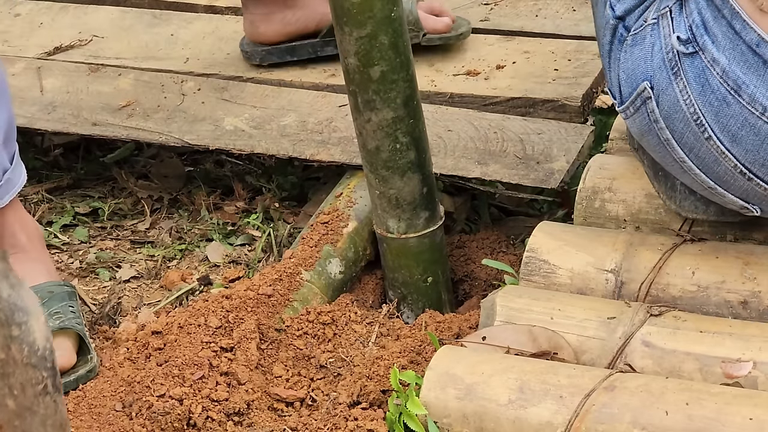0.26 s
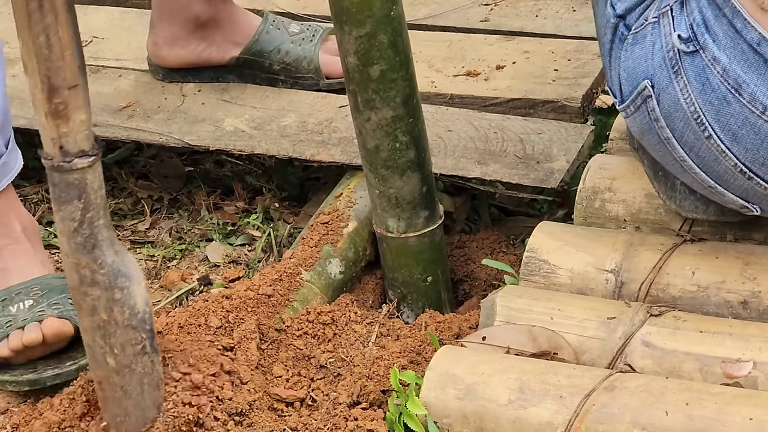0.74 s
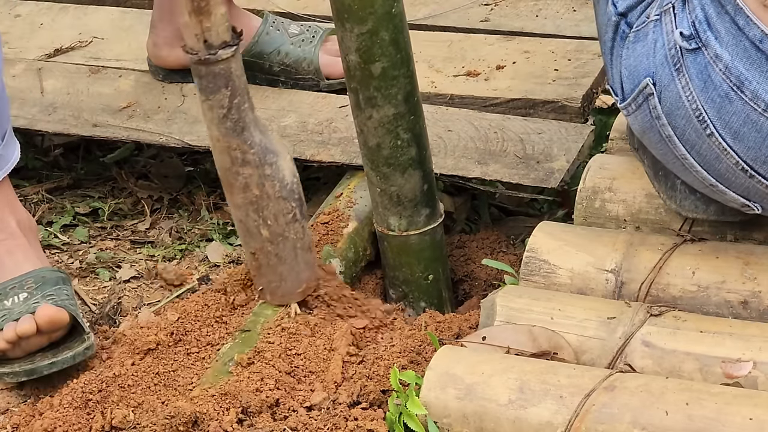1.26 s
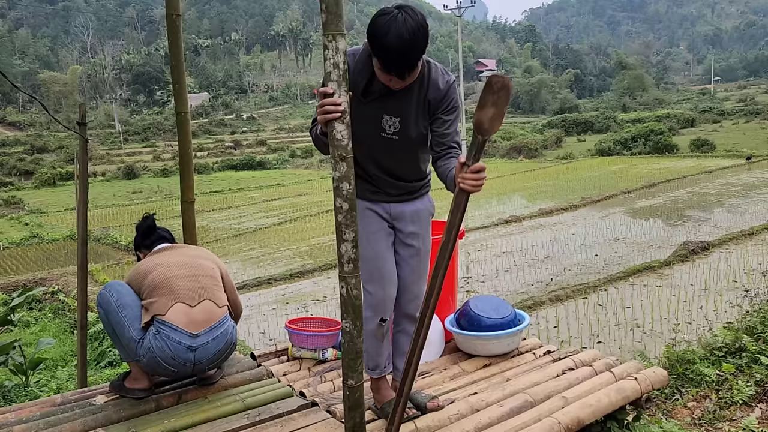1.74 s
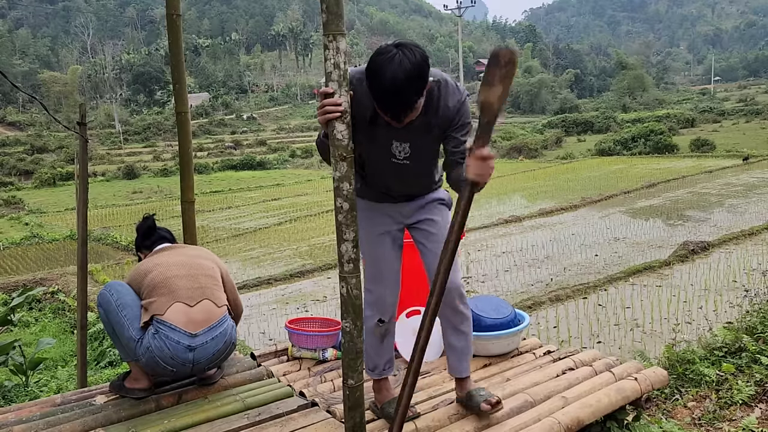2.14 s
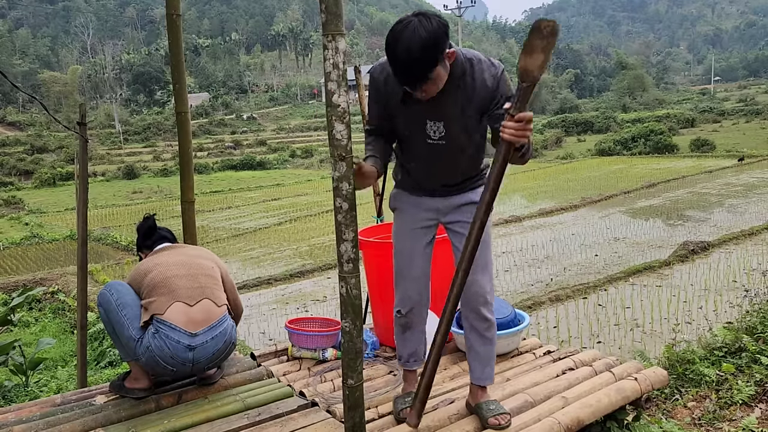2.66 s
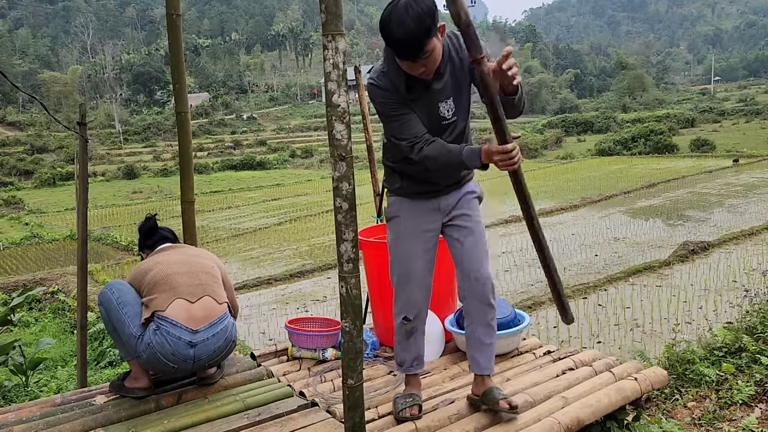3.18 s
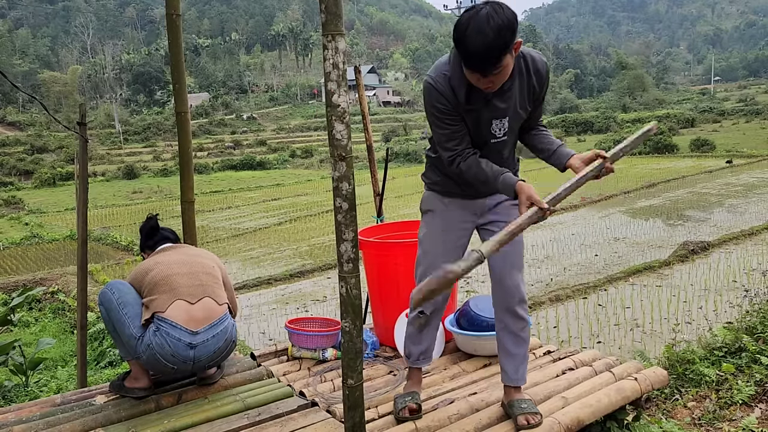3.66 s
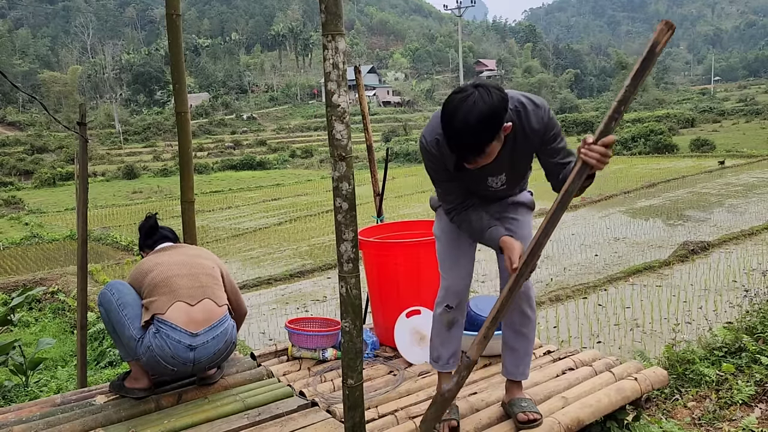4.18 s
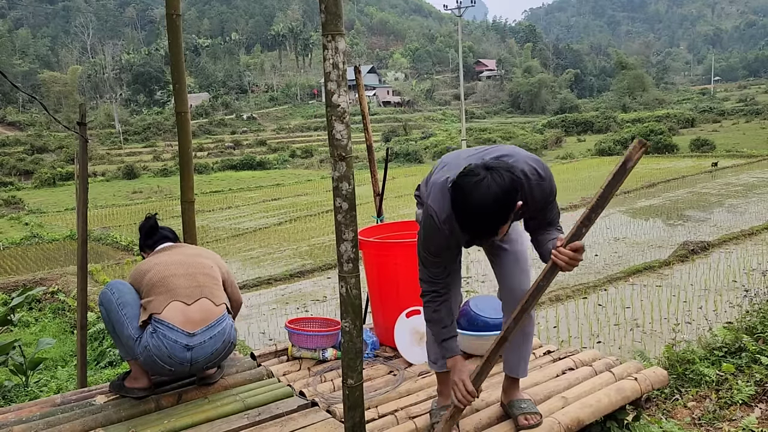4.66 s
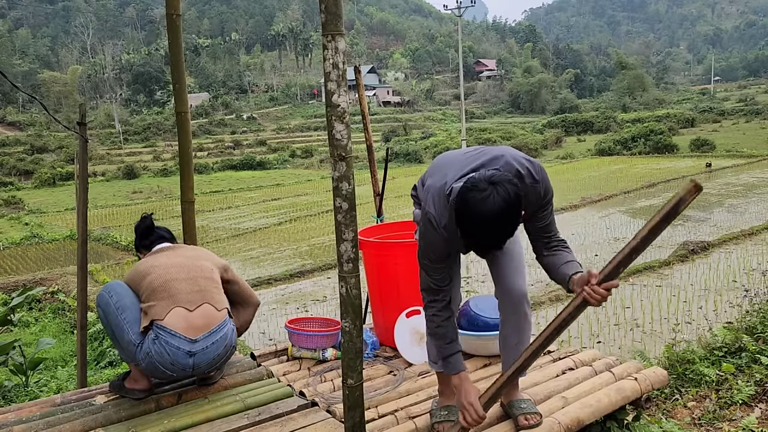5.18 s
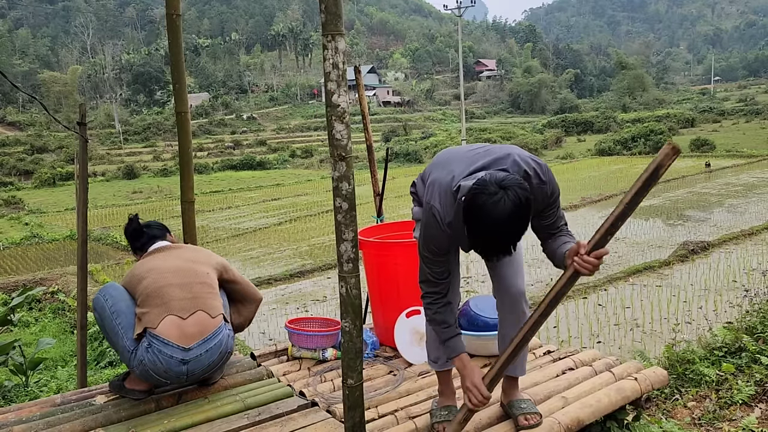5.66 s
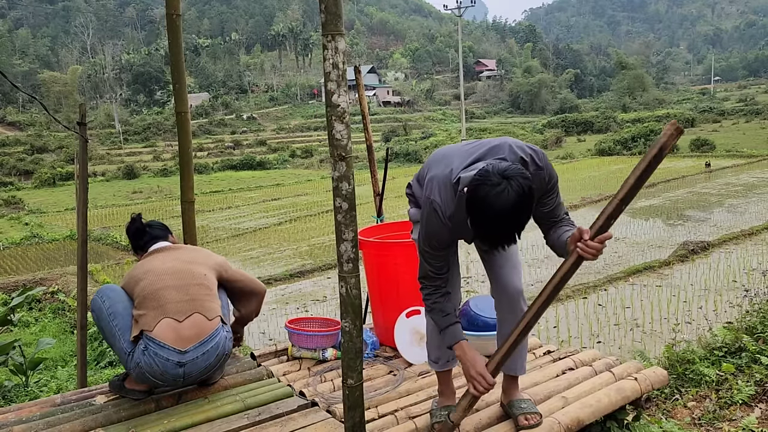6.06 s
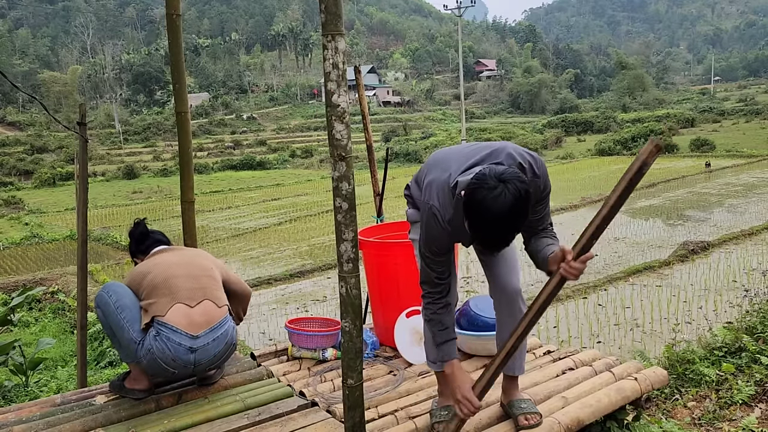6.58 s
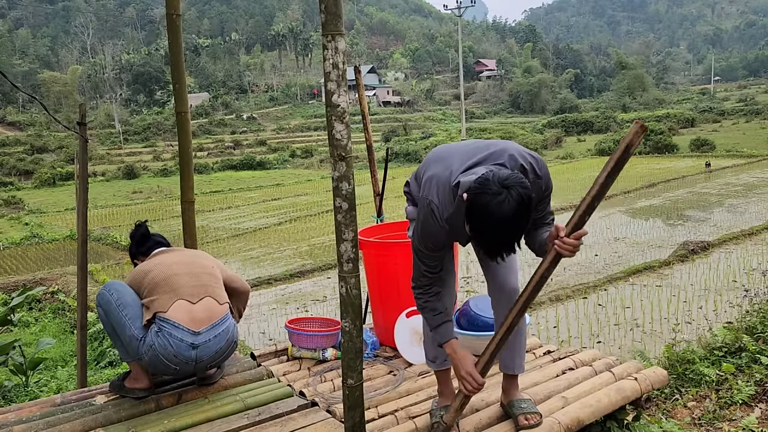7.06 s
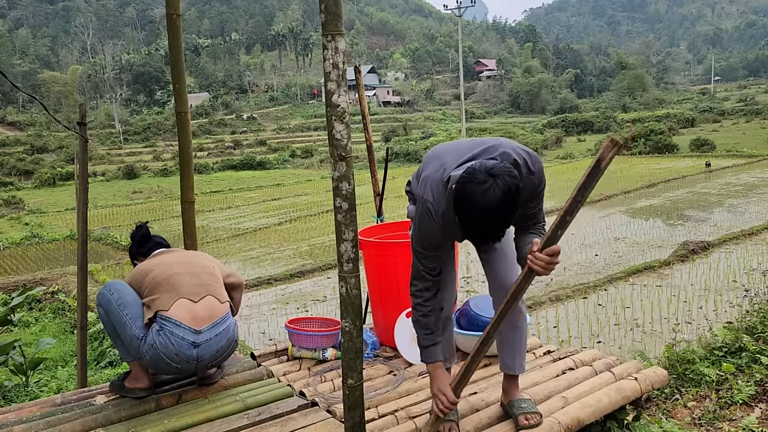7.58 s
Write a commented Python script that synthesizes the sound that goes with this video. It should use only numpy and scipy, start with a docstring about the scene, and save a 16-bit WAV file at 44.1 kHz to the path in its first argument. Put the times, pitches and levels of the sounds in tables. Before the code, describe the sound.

Outdoor tamping work beside fields. First, dry grainy scrapes and dull clod crunches very near the microphone, over a low motor drone. Then a wider, quieter view: a strong wooden bang, irregular knocks on bamboo slats with soft shuffles, a pause, and crisp crunching thrusts about three per second with pebbles cracking. High cricket chirps in twos and threes, thin insect hiss, faint bird notes and slow distant engine puffs lie behind.

```python
"""Beside rice fields, on a bamboo deck: earth is packed round a bamboo post.
The pole first scrapes loose soil close by (filtered grains under stroke envelopes); then, further back,
feet and pole knock on the deck (struck modes) and the pole jabs gritty earth (grain bursts, cracks).
A cricket chirps in twos and threes (sagging tones), insects hiss (shaped noise), birds and poultry call
faintly (gliding tones, harmonics); a far one-cylinder diesel drones (harmonics), then thuds (puffs)."""
import sys
import numpy as np
from scipy import signal
from scipy.fft import rfft, irfft
from scipy.io import wavfile

SR = 44100
rng = np.random.default_rng(int(sys.argv[2]) if len(sys.argv) > 2 else 0)


def dump_mix(stems):
    """Bounce the given channels to the path in sys.argv[1] as a 16-bit WAV at rate SR."""
    frames = np.atleast_2d(stems).T  # one column per channel
    limited = np.clip(frames, -1, 1)  # hard clip at full scale
    pcm = np.round(limited * 32767).astype(np.int16)
    wavfile.write(sys.argv[1], SR, pcm)


N = 344862
TIME = np.arange(N) / SR
HIT = TIME[:SR // 2]  # time axis of one event


def undb(db):
    """Decibels to gain."""
    return 10 ** (np.asarray(db) / 20)


def unit(x):
    """Scale to rms 1."""
    return x / np.sqrt(np.mean(x ** 2))


def curves(table):
    """Each column of a (s, ..) table at every sample."""
    s, *columns = np.transpose(table)
    return [np.interp(TIME, s, c) for c in columns]


def add(track, s, sound):
    """Mix a sound into the track from time s on."""
    start = max(int(s * SR), 0)
    part = sound[:N - start]
    track[start:start + len(part)] += part


def colour(x, spectrum, peaks=()):
    """Shape by a spectrum and optional resonances; rms 1."""
    f = np.maximum(np.fft.rfftfreq(len(x), 1 / SR), 1)
    hz, db = np.transpose(spectrum)
    shape = np.interp(np.log(f), np.log(hz), db)
    for centre, width, lift in peaks:
        shape = shape + lift / (1 + (2 * (f - centre) / width) ** 2)
    return unit(irfft(rfft(x) * undb(shape), len(x)))


def lowpass(x, hz, order=2):
    """Causal low-pass."""
    return signal.sosfilt(signal.butter(order, min(hz, SR / 2 - 1), fs=SR, output="sos"), x)


def walk(rate, size=N):
    """Random wander with a spread near 1; rate in knots per s."""
    knots = rng.standard_normal(int(size / SR * rate) + 2)
    return np.interp(TIME[:size] * rate, np.arange(len(knots)), knots)


def grains(size, per_s, spread_db):
    """Dense tiny clicks of uneven strength; rms 1."""
    present = rng.random(size) < per_s / SR
    boost_db = spread_db * np.minimum(rng.exponential(size=size), np.pi)
    return unit(present * rng.standard_normal(size) * undb(boost_db))


def ring(hz, t60):
    """One struck mode."""
    return np.sin(2 * np.pi * hz * HIT) * np.exp(-np.log(1000) * HIT / t60)


def crumbly(x, rate, patchy_db, count=12):
    """Crumbs of different sizes break at different moments, so each band flares on its own; rms 1."""
    spectrum = rfft(x)
    band = count * np.sqrt(np.linspace(0, 1, len(spectrum)))
    total = 0
    for k in range(count):
        part = irfft(spectrum * np.maximum(1 - np.abs(band - k), 0), len(x))
        total = total + part * undb(patchy_db * walk(rate, size=len(x)))
    return unit(total)


def spread(source, wide_hz, side_db):
    """Sound from many places: the two ears share the bass and differ in the treble."""
    mid, side = source(), source()
    side = side - lowpass(side, wide_hz, order=1)
    return mid + undb(side_db) * side * np.array([[1], [-1]])


def outdoors(x, lag_ms, scatter_db, t60):
    """The left ear hears a little later; deck and plants scatter a short tail, mostly treble."""
    x = np.broadcast_to(x, (2, N))
    tails = rng.standard_normal((2, len(HIT))) * np.exp(-np.log(1000) * HIT / t60)
    tails = signal.sosfilt(signal.butter(2, 850, "high", fs=SR, output="sos"), tails)
    tails *= undb(scatter_db) / np.sqrt(np.sum(tails ** 2, axis=1, keepdims=True))
    khz = np.fft.rfftfreq(N, 1000 / SR)
    left = irfft(rfft(x[0]) * np.exp(-2j * np.pi * khz * lag_ms), N)
    return np.array([left, x[1]]) + signal.fftconvolve(x, tails, axes=1)[:, :N]


# background spectra by the heap, over the fields, of the insects: pitch_hz, relative_db (per Hz)
NEAR_AIR = [(25, -3), (55, 13), (110, 11), (220, 1), (300, -5.5), (410, -17), (560, 1), (660, -4.5),
            (790, -4), (920, -11), (1550, -6.5), (1950, -16), (3400, -17), (7000, -19.5), (11000, -38.5),
            (15500, -39)]
FIELD = [(18, -38), (30, -14.5), (75, -5), (126, -1.5), (160, -11.5), (195, -27.5), (320, -29.5),
         (410, -22), (505, -35), (1590, -41.5), (2550, -48.5), (3490, -46), (3980, -49), (6540, -42),
         (10200, -62), (15500, -70)]
INSECTS = [(4000, -13.5), (5000, -5.5), (5900, -3), (6700, 2.5), (7400, -3.5), (8500, -14), (10500, -22.5)]


def ambience(spectrum, db, flicker_db, wide_hz):
    """Diffuse shaped noise that wavers slowly and flickers."""
    air = spread(lambda: colour(rng.standard_normal(N), spectrum), wide_hz, 0.76)
    return air * undb(db + flicker_db * (walk(1.574) + walk(9.1)))


# diesel running fast: time_s, firing_hz, drone_db (before a 3 dB trim)
FAST = [(0, 35.95, -44), (.3, 36.68, -46), (.75, 36.9, -45.5), (1.25, 36.97, -47.5), (1.7, 36.7, -48.5),
        (1.9, 35.46, -45.5)]
# its harmonics: multiple, relative_db
FAST_ORDERS = [(1, -6.5), (2, 4.5), (3, -16), (4, -18.5), (5, -12.5), (6, -9), (7, -20), (8, -29),
               (15, -23), (21, -23)]


def fast_diesel():
    """At speed the firings merge into a wavering drone of harmonics."""
    hz, db = curves(FAST)
    phase = 2 * np.pi * np.cumsum(hz) / SR
    drone = 0
    for k, g in FAST_ORDERS:
        tone = np.sin(round(k) * phase + 2 * np.pi * rng.random())
        drone = drone + undb(g + 0.29 * walk(8.8)) * tone
    return unit(drone) * undb(db - 3.0)


# diesel running slowly: time_s, firing_hz
SLOW = [(1.9, 25.21), (2.4, 26.22), (3.2, 25.49), (3.6, 26.41), (4.1, 24.37), (5.0, 25.42), (5.6, 24.22),
        (6.8, 25.14), (7.8, 25.04)]
# thud as the air carries it: time_s, base_db
THUD_LEVEL = [(1.95, -52.5), (2.17, -49.5), (3.25, -49.5), (3.68, -54.5), (4.31, -49.5), (5.46, -56.5),
              (6.35, -51.5), (7.55, -53.5), (7.6, -51)]
# gas rasping in the exhaust: pitch_hz, relative_db (per Hz)
RASP = [(150, -22), (240, -2), (410, 1.5), (520, -8.5), (750, -16), (1500, -21), (4000, -58)]
THUD_DB, THUD_SCATTER_DB = 5, 1.96  # puff gain over base_db; spread from puff to puff
# the bass fades first, so a weaker thud sits higher
THUD_HZ, FULL_THUD_DB, THINNING_HZ_PER_DB = 101.7, -48.5, 2.5
HARDER_S, HARDER_HZ = 4.88, 15.2  # from here on the thuds sound harder and higher
SOFT_BARK_DB, HARD_BARK_DB = -40, -18.5  # mid-range rasp against the thud
SOFT_BARK_S, HARD_BARK_S = 0.0041, 0.0064  # half length of the rasp


def slow_diesel():
    """Separate exhaust puffs, rounded by distance; the air makes each one louder or softer."""
    hz, = curves(SLOW)
    db, = curves(THUD_LEVEL)
    harder = TIME > HARDER_S
    centre_hz = THUD_HZ + THINNING_HZ_PER_DB * (FULL_THUD_DB - db) + HARDER_HZ * harder
    out, t = np.zeros(N), HIT[:SR // 10] - 1 / 20
    gas = colour(rng.standard_normal(N + len(t)), RASP)
    firings = np.flatnonzero(np.diff(np.floor(np.cumsum(hz) / SR)))
    for i in firings:
        puff = np.exp(-(t / 0.012) ** 2) * np.cos(2 * np.pi * centre_hz[i] * t)
        boom = 0.54 * np.exp(-(t / 0.01) ** 2) * np.cos(2 * np.pi * 62 * t)
        bark_db, bark_s = (HARD_BARK_DB, HARD_BARK_S) if harder[i] else (SOFT_BARK_DB, SOFT_BARK_S)
        bark = undb(bark_db) * np.exp(-(t / bark_s) ** 2) * gas[i:i + len(t)]
        puff_db = db[i] + THUD_DB + THUD_SCATTER_DB * rng.standard_normal()
        add(out, i / SR - .04, (puff + boom + bark) * undb(puff_db))
    return out


# faint far call, perhaps a rooster: time_s, pitch_hz, base_db
CROW = [(5.6, 532, -93), (5.67, 524, -72), (5.74, 528, -77), (5.8, 542, -75), (5.85, 556, -72),
        (5.9, 565, -87)]
# its harmonics: multiple, relative_db
CROW_ORDERS = [(2, 3.5), (3, -1), (4, -12.5)]


def rooster():
    """Only the middle harmonics carry across the fields; the call wavers and ends."""
    hz, db = curves(CROW)
    calling = (TIME > CROW[0][0]) & (TIME < CROW[-1][0])
    phase = 2 * np.pi * np.cumsum(hz * (1 + 0.0111 * walk(70))) / SR
    harmonics = [undb(db + g + 3.0 * walk(25)) * np.sin(k * phase)
                 for k, (_, g) in enumerate(CROW_ORDERS, 2)]
    return calling * sum(harmonics)


# far hens: centre_s, pitch_hz, base_db, half_length_s
SQUAWKS = [(5.555, 379, -63, 0.012), (5.8, 435, -62.5, 0.0092)]
# their harmonics: multiple, relative_db
HEN_THROAT = [(3, -1), (4, -13), (5, -2)]


def hens():
    """Short nasal squawks of three upper harmonics."""
    out, t = np.zeros(N), HIT[:SR // 5] - 1 / 10
    for s, hz, db, half in SQUAWKS:
        phase = 2 * np.pi * np.cumsum(hz * (1 + 0.015 * walk(200, size=len(t)))) / SR
        voice = sum(undb(db + g) * np.sin(k * phase) for k, (_, g) in enumerate(HEN_THROAT, 3))
        add(out, s - 1 / 10, np.exp(-(t / half) ** 2) * voice)
    return out


# far bird's notes: centre_s, pitch_hz, level_db, fall_per_s (share of the pitch)
BIRD = [(3.085, 2730, -72.5, 1.6), (3.262, 2900, -71.5, 4.8), (3.536, 2830, -72, 2.4),
        (5.719, 3340, -72, 1), (6.55, 3140, -69, 1.4), (7.14, 2195, -63.5, 0.21), (2.995, 2150, -66, 0.7),
        (2.993, 2640, -70.5, .3)]
FLOCK_HZ, FLOCK_DB = 900, -79  # lowest pitch and loudest note of the farthest birds


def bird():
    """Short whistles that slide down; many fainter birds twitter, sliding either way."""
    out, t = np.zeros(N), HIT[:SR // 5] - 1 / 10
    flock = [(s * N / SR, FLOCK_HZ * 3 ** pitch, FLOCK_DB - 10 * far, 4 * (fall - .5))
             for s, pitch, far, fall in rng.random((170, 4))]
    for s, hz, db, fall in list(BIRD) + flock:
        tone = np.sin(2 * np.pi * np.cumsum(hz * (1 - fall * t)) / SR)
        add(out, s - 1 / 10, undb(db) * np.exp(-(t / 0.021) ** 2) * tone)
    return out


# cricket's wing tone: time_s, pitch_hz
WING = [(2.1, 3480), (2.9, 3440), (3.6, 3580), (4.4, 3552), (6.2, 3434), (7.1, 3493), (7.8, 3575)]
# bouts of song: start_s, end_s, first_period_s, pulses_per_chirp, base_db
BOUTS = [(2.139, 2.45, .0895, 2, -59.5), (2.504, 2.7, .084, 2, -60), (2.77, 3.35, 0.0915, 2, -60.5),
         (3.392, 3.56, .126, 2, -60), (3.621, 3.85, 0.16, 3, -58.5), (3.906, 4.05, 0.097, 2, -58.5),
         (4.102, 4.15, .124, 3, -58.5), (4.232, 4.42, .12, 2, -58), (4.509, 4.55, .1, 2, -58.5),
         (6.156, 6.66, .0925, 2, -56.5), (6.708, 7.1, .0895, 2, -60), (7.161, 7.6, .0937, 2, -59),
         (7.633, 7.78, .096, 2, -62.5)]
TIRING_S = .00036  # growth of the chirp period, per chirp
PULSE_GAP_S, SAG_HZ_PER_S, FIRST_PULSE_DB = .028, 14000, -2.5
WARM_UP_DB, WARM_UP_S, PAUSE_S = -8, 0.45, 1  # after a long pause the song starts softly


def cricket():
    """Each closing of the wings is a short sagging tone, the first weaker; chirps slow through a bout."""
    out, t = np.zeros(N), HIT[:SR // 10] - 1 / 20
    woke = last_end = 0
    for s, end, period, pulses, db in BOUTS:
        woke, last_end = (s if s - last_end > PAUSE_S else woke), end
        while s < end:
            hz = np.interp(s, *np.transpose(WING))
            chirp_db = db + WARM_UP_DB * np.exp((woke - s) / WARM_UP_S)
            for k in range(int(round(pulses))):
                pulse_hz = hz * (1 + 0.00794 * rng.standard_normal())
                sag = SAG_HZ_PER_S * (1 + 0.2 * rng.standard_normal())
                tone = np.sin(2 * np.pi * np.cumsum(pulse_hz - sag * t) / SR)
                pulse_db = chirp_db + FIRST_PULSE_DB * (k == 0) + 1.7 * rng.standard_normal()
                pulse = tone * np.exp(-np.abs(t / 0.0072) ** 2.6) * undb(pulse_db)
                add(out, s + k * PULSE_GAP_S - 1 / 20, pulse)
            s, period = s + period, period + TIRING_S
    return out


# clods crushed in the heap: peak_s, base_db, pitch_hz, rise_s, decay_s
CLODS = [(.42, -54, 1340, 0.038, 0.027), (.5, -61, 2100, 0.049, 0.033), (.535, -54, 840, .002, 0.022)]
CLOD_WIDTH, CLOD_RING_DB = 0.79, 18  # resonance width as a share of the pitch; its lift


def clods():
    """A clod gives way in small jerks with a dull, hollow crunch."""
    out, t = np.zeros(N), HIT - 1 / 10
    dull = [(200, -6), (600, 3), (2500, 3), (8000, -20)]
    for s, db, hz, rise, decay in CLODS:
        crunch = colour(grains(len(HIT), 2500, 1.2), dull, [(hz, CLOD_WIDTH * hz, CLOD_RING_DB)])
        force = np.exp(-(np.minimum(t, 0) / rise) ** 2 - np.maximum(t, 0) / decay)
        add(out, s - 1 / 10, crunch * force * undb(db + 1.6 * walk(146, size=len(HIT))))
    return out


# strokes of the pole through loose soil: start_s, end_s, rub_base_db, sliding_crumbs_base_db
STROKES = [(0.298, 0.52, -59, -91), (0.628, 0.725, -63.5, -66), (0.774, 0.817, -82, -74),
           (0.906, 1.045, -60.5, -88), (1.055, 1.368, -63, -63.5), (1.733, 1.9, -58, -81)]
# spectra of rubbing and of crumbs: pitch_hz, relative_db (per Hz)
RUB = [(200, -24), (400, -8), (700, 2), (1200, -1.5), (1800, -9.5), (2500, -10), (4200, -10), (8000, -22.5),
       (12000, -49)]
CRUMBS = [(880, -31), (1500, -6), (1660, -6), (2340, -13), (3300, -7.5), (4120, -8), (5000, -11.5),
          (13800, -11.5), (16000, -15)]
# a stroke gathers soil over the first share of its length, then stops quickly
SWELL_DB, SWELL_SHARE, RELEASE_S = 11, 0.45, 0.019
RESTING_RUB_DB = -73  # base level of soil stirring between strokes


def scraping():
    """The pole rubs through loose soil; fine crumbs slide down the heap, a few coarse ones crackle."""
    rubbing, sliding = undb(RESTING_RUB_DB), 0
    for start, end, rub_db, crumb_db in STROKES:
        gathered = np.clip((TIME - start) / (SWELL_SHARE * (end - start)), 0, 1)
        outside = np.maximum(start - TIME, 0) + np.maximum(TIME - end, 0)
        push = undb(SWELL_DB * (gathered - 1)) * np.exp(-outside / RELEASE_S)
        rubbing = np.hypot(rubbing, undb(rub_db) * push)
        sliding = np.hypot(sliding, undb(crumb_db) * push)
    rub = colour(grains(N, 1500, 1.0), RUB) * rubbing * undb(-1.5 + 2 * walk(61.5))
    fine = crumbly(colour(grains(N, 6000, 1.004), CRUMBS), 110, patchy_db=2.0)
    coarse = colour(grains(N, 270, 1.08), CRUMBS)
    return rub + (0.99 * fine + 0.21 * coarse) * sliding * undb(6.5 + 2.0 * walk(44.94))


# soft shuffles of feet and hands: centre_s, level_db, half_length_s, lowpass_hz
SHUFFLES = [(0.408, -57, 0.061, 1900), (0.52, -53.5, 0.038, 3000), (1.88, -55, .055, 1400),
            (1.999, -59, 0.02, 4504), (2.24, -61.5, 0.035, 7800), (2.28, -35.5, 0.025, 900),
            (2.327, -56.5, 0.088, 3800), (2.647, -61.5, 0.09, 7200), (2.992, -62, 0.038, 7400),
            (2.695, -57, 0.034, 1610), (3.435, -53, 0.031, 2500), (4.152, -58, 0.034, 1090),
            (4.204, -56.5, 0.03, 4500), (4.656, -67.5, 0.025, 2518), (4.793, -72, 0.087, 8500),
            (5.334, -67.5, 0.037, 4500), (6.077, -70, 0.049, 4000), (6.19, -66, 0.041, 5060),
            (6.271, -57.5, 0.012, 6760), (6.73, -62, 0.023, 7500), (7.101, -64, 0.054, 8000),
            (7.36, -64, 0.35, 950)]
# resonances of the pole and its hole, also used by the thrusts: pitch_hz, width_hz, lift_db
POLE = [(568, 45, 6.5), (1000, 85, 7.5), (1590, 260, 8.5), (2152, 84, 13), (3630, 1300, 6)]
# hands keep stirring the soil during the jabs
RUSTLE_FROM_S, RUSTLE_DB, RUSTLE_HZ, RUSTLE_WANDER_DB = 5.6, -77.5, 3430, 8


def shuffles():
    """Sandals and hands brush over grit; a faint rustle goes on between the jabs."""
    brushed = [(150, 8.5), (500, 3.5), (1500, -1.5), (4500, 2.0), (9000, 5.5), (16000, -1.5)]
    grit = crumbly(colour(grains(N, 9000, 1.0), brushed, POLE), 130, patchy_db=5.5)
    brushes = 0
    for s, db, half, hz in SHUFFLES:
        brushes = brushes + undb(db) * np.exp(-((TIME - s) / half) ** 2) * lowpass(grit, hz)
    rustle_gain = (TIME > RUSTLE_FROM_S) * undb(RUSTLE_DB + RUSTLE_WANDER_DB * walk(3.0))
    return brushes + rustle_gain * lowpass(grit, RUSTLE_HZ)


# the deck bending under feet and pole: start_s, level_db, pitch_hz, t60_s
FLEXES = [(2.2702, -13.5, 141, 0.013), (2.2746, -28, 294, 0.032), (2.292, -29, 150, 0.027),
          (2.716, -50, 167, .13), (3.409, -44, 180, .08), (3.421, -42, 151, 0.058),
          (3.454, -41.5, 190, 0.11), (4.126, -44, 170, 0.12), (4.397, -45, 149.4, 0.079),
          (6.984, -56, 230, 0.034)]


def flexes():
    """The deck gives under a load and booms briefly."""
    out = np.zeros(N)
    for s, db, hz, t60 in FLEXES:
        add(out, s, undb(db) * lowpass(ring(hz, t60), 900))
    return out


def thud():
    """The heavy, quickly damped bounce of deck and ground; the soft contact rounds its start."""
    low = ring(70.0, 0.2) * 0.18 + ring(129, 0.09) * 0.56 - ring(189.5, 0.084) * 0.29
    high = ring(241, 0.039) * 0.26 + ring(380, 0.035) * 0.26
    return lowpass(low + high, 310)


# knocks on the deck: start_s, clack_db, contact_lowpass_hz, thud_db, slat_hz, slat_db, slat_t60_s,
# sand_db (against the clack), ring_length (share of a free deck's)
KNOCKS = [(.417, -41, 1000, -62, 770, -46, 0.058, -30, 0.79),
          (.533, -35, 1000, -57, 630, -47.5, 0.12, -16, 1.3),
          (1.504, -38, 2290, -70, 1480, -44, 0.027, -24, 1),
          (1.595, -45, 1396, -63, 1000, -49, 0.033, -30, 1),
          (2.207, -30.5, 1240, -33, 528, -45.5, 0.075, -20, 1.1),
          (2.2674, -14.5, 1150, -38, 900, -28, 0.017, -22.5, 0.28),
          (2.2702, -14.5, 800, -46, 610, -20.5, 0.022, -26, 0.26),
          (2.294, -20, 710, -38, 391, -34, .06, -40, 1.1),
          (2.308, -15.5, 3000, -31.5, 2245, -28.5, 0.027, -23, 0.67),
          (2.659, -44, 900, -54, 505, -54.5, 0.11, -26, 1.05),
          (2.719, -33, 1900, -55, 500, -47, 0.047, -15, 0.77),
          (2.722, -37, 1900, -60, 1550, -41, 0.023, -27, 0.47),
          (2.741, -42, 1190, -37, 476, -48, 0.077, -29, 0.92),
          (2.831, -42, 1130, -50, 480, -52.5, 0.054, -30, 1.05),
          (2.857, -48, 1000, -62, 1030, -59, .056, -28, 1),
          (3.393, -37.5, 1900, -56, 1263, -42.5, 0.037, -8, 1.3),
          (3.4438, -20, 1900, -49, 1234, -35, 0.033, -18.5, 0.72),
          (3.448, -39, 1200, -55, 493, -39, 0.11, -29, 1),
          (3.4615, -31.5, 1490, -50, 1480, -42, .03, -33, 0.61),
          (3.812, -33.5, 2000, -74, 607, -48, 0.24, -14.5, 0.67),
          (3.816, -50, 1500, -55, 565, -47.5, 0.091, -25, 1),
          (4.114, -42, 800, -38, 480, -48, 0.046, -25, 1),
          (4.129, -55, 1410, -48, 1366, -68, 0.3, -24, 1.5),
          (4.210, -32, 2830, -62, 1625, -41.5, 0.032, -12.5, 0.81),
          (4.23, -32.5, 2000, -39.5, 523, -54, 0.11, -24, 0.73),
          (4.385, -48, 900, -55, 748, -44, 0.087, -30, 1),
          (6.5215, -39, 1110, -72, 710, -46.5, 0.024, -36, 0.67),
          (6.673, -32, 900, -42, 436, -43, 0.056, -30, 0.85),
          (7.001, -32.5, 2590, -52, 1450, -39, .023, -28, 1.19)]
# deck modes, ringing freely: pitch_hz, relative_db, t60_s
DECK = [(435, -22.5, 0.21), (526, -8.5, 0.098), (696, -40, 0.012), (800, -32, 0.02), (970, -2, 0.071),
        (1213, 2, 0.03), (1310, -2.5, 0.042), (1513, 3, 0.041), (1830, -5, 0.022), (2000, 0.5, 0.055),
        (2245, -0.5, 0.034), (2930, 5, 0.035), (3240, -9, 0.077), (3800, 10, 0.015), (4770, 8, 0.033)]
# sand crushed under a blow: pitch_hz, relative_db (per Hz)
SAND = [(200, -12), (1000, 9.5), (3500, 3.5), (6500, -1.5), (9000, -8), (16000, -20)]
SLAT_BUZZ, SLAT_BUZZ_HZ = 0.25, 260  # a slat chatters in its lashings: depth and rate


def knocks():
    """Each blow rings deck and slat; softer contact dulls it, and sand crunches under it."""
    out = np.zeros(N)
    for s, db, bright_hz, thud_db, slat_hz, slat_db, slat_t60, sand_db, free in KNOCKS:
        place_db, detune = rng.standard_normal((2, len(DECK)))  # each spot favours other modes
        modes = 0
        for (hz, g, t60), p, d in zip(DECK, place_db, detune):
            mode = ring(hz * (1 + 0.024 * d), t60 * free)
            modes = modes + rng.choice([-1, 1]) * undb(g + 0.5 * p) * mode
        crack = rng.standard_normal(len(HIT)) * (np.exp(-HIT / 0.0026) + 0.06 * np.exp(-HIT / 0.036))
        sand = colour(grains(len(HIT), 12000, 1.3), SAND) * np.exp(-HIT / 0.0039)
        contact = 1 - np.exp(-HIT / 0.00097)
        clack = contact * (lowpass(0.14 * modes + 0.61 * crack, bright_hz) + undb(sand_db) * sand)
        slat = ring(slat_hz, slat_t60) * (1 + SLAT_BUZZ * walk(SLAT_BUZZ_HZ, size=len(HIT)))
        add(out, s, undb(db) * clack + undb(thud_db) * thud() + undb(slat_db) * slat)
    return out


# pebbles and hard crumbs cracking under pole and feet: start_s, level_db, pitch_hz, decay_s
PEBBLES = [(0.655, -54, 4530, 0.0016), (.663, -43.5, 7800, 0.0041), (0.7049, -39, 1730, 0.0028),
           (0.722, -46.5, 7600, 0.0044), (1.044, -57, 11000, .006), (1.3155, -49, 4100, .004),
           (1.35, -58, 4100, 0.0068), (1.425, -57, 4000, .004), (2.228, -53.5, 6000, 0.0033),
           (2.284, -46, 4000, .003), (4.378, -33.5, 1370, 0.0043), (5.197, -43, 4500, 0.0017),
           (5.222, -40, 3020, 0.0015), (5.547, -54.5, 6850, 0.0043), (5.583, -54, 3800, 0.0068),
           (5.62, -45, 2200, .003), (5.627, -43, 9050, .003), (5.968, -39, 7995, .002),
           (5.9851, -36, 9010, 0.0019), (6.004, -40, 1710, .002), (6.1004, -54, 8450, 0.002),
           (6.321, -35, 4800, 0.0016), (6.3396, -42, 2100, 0.0026), (6.6605, -35, 4500, 0.0017),
           (6.6696, -33, 3400, 0.0037), (7.018, -45, 3900, 0.0032), (7.3135, -41.5, 5050, 0.0023),
           (7.319, -43, 1700, 0.0021), (7.343, -39, 2000, 0.0018), (7.386, -56, 10500, .004),
           (7.6394, -39, 3900, 0.0034)]
# spectrum of grit, also used by the thrusts: pitch_hz, relative_db (per Hz)
GRIT = [(100, 0.5), (300, -4.5), (550, -2.5), (1000, -3.5), (1700, -4), (3000, -5), (4500, -2.5),
        (8000, -2), (12000, -5), (16000, -6.5)]
PEBBLE_RING_DB, PEBBLE_WIDTH = 14.5, 0.62  # resonance lift; its width as a share of the pitch


def pebbles():
    """A pebble gives way with a sharp crack, coloured by its size."""
    out = np.zeros(N)
    for s, db, hz, decay in PEBBLES:
        peak = (hz, PEBBLE_WIDTH * hz, PEBBLE_RING_DB)
        crack = colour(rng.standard_normal(len(HIT)), GRIT, [peak])
        add(out, s, undb(db) * crack * np.exp(-HIT / decay) * (1 - np.exp(-HIT / 0.00023)))
    return out


# thrusts into the earth: start_s, grit_db, rise_s, hold_s, decay_s, treble_db, hollow_ring_db, thud_db
THRUSTS = [(0.65, -53.5, 0.0035, 0.012, 0.0062, 2.5, 0, -70),
           (.6935, -48, 0.0012, 0.013, 0.0056, -0.5, 4, -51),
           (0.786, -69.5, 0.013, .0027, 0.011, 11.5, -1, -52),
           (1.404, -43, 0.0026, 0.007, 0.016, -9, -6.5, -65),
           (4.3718, -33, 0.0032, 0.014, 0.0072, -4, 3.5, -32),
           (5.198, -38.5, 0.0044, 0.028, 0.0043, -4, 2.5, -46),
           (5.595, -44.5, 0.0036, 0.04, 0.0058, -3.5, 4, -43),
           (5.972, -38.5, 0.0089, 0.018, 0.009, -4.5, -1.5, -60),
           (6.32, -38.5, 0.0079, 0.0032, 0.0082, -0.5, 1, -48),
           (6.67, -32.5, 0.012, 0.0065, 0.0056, -13.5, -4.5, -37),
           (7.002, -45.5, 0.021, 0.012, 0.011, -5, -1, -61),
           (7.314, -50, 0.012, 0.026, 0.014, -0.5, 0, -50),
           (7.637, -49.5, 0.0056, 0.0021, 0.019, -1.5, 8, -37)]


def thrusts():
    """The pole crushes grit as long as it sinks, the ground thuds, and crumbs trickle after it."""
    out, lead = np.zeros(N), .05  # s of room for the rise
    for s, db, rise, hold, decay, treble_db, hollow_db, thud_db in THRUSTS:
        after = np.maximum(HIT - lead - hold, 0)
        onset = np.exp(-(np.minimum(HIT - lead, 0) / rise) ** 2)
        force = onset * (np.exp(-(after / decay) ** 0.98) + undb(-30.5) * np.exp(-after / 0.077))
        loose = 1 - np.exp(-after / 0.033)
        # the earth gives way in jerks, then in single crumbs
        slips = undb((0.73 + 2.3 * loose) * walk(219.5, size=len(HIT)))
        peaks = [(hz * (1 + 0.019 * rng.standard_normal()), width, lift) for hz, width, lift in POLE]
        peaks.append((675, 830, hollow_db))
        grit = crumbly(colour(grains(len(HIT), 12000, 2.4), GRIT, peaks), 419.0, patchy_db=3.5)
        body = lowpass(grit, 1440, order=1)
        add(out, s - lead, undb(db) * force * slips * (body + undb(treble_db) * (grit - body)))
        add(out, s, undb(thud_db) * thud())
    return out


MOVE_S, MOVE_FADE_S = 1.95, 0.12  # mid-time and length of the crossfade between listening places


def scene():
    """First close to the heap of soil, then back on the deck."""
    moved = np.clip((TIME - MOVE_S) / MOVE_FADE_S + .5, 0, 1)
    close = spread(lambda: scraping() + clods(), 1400, 0.032)
    close = close + fast_diesel() + ambience(NEAR_AIR, -58.5, 0.81, 750)
    field = ambience(FIELD, -58.5, 1.0, 480) + ambience(INSECTS, -77.0, 0.37, 1000) + slow_diesel()
    far_calls = outdoors(rooster() + hens() + bird(), .02, -2.2, 0.22)
    creatures = outdoors(cricket(), 0.013, -6.5, 0.086) + far_calls
    earth = spread(lambda: thrusts() + pebbles(), 720, -6.0) + spread(shuffles, 620, -2.5)
    work = outdoors(knocks() + flexes(), 0.029, -4.0, 0.076) + outdoors(earth, 0.025, -13.0, 0.24)
    return (1 - moved) * close + moved * (field + creatures) + work


# left microphone over the right: pitch_hz, lead_db
LEFT_LEAD = [(200, 0), (600, .5), (2000, -.5), (7000, -1), (12000, 2.3)]
TOP_HZ = 15800


def record(dry):
    """The microphones differ a little in colour; the recorder drops deepest rumble and cuts the top."""
    hz, db = np.transpose(LEFT_LEAD)
    lead_db = np.interp(np.fft.rfftfreq(N, 1 / SR), hz, db)
    dry = irfft(rfft(dry) * undb(np.array([lead_db, -lead_db]) / 2), N)
    dry = signal.sosfilt(signal.butter(3, 32, "high", fs=SR, output="sos"), dry)
    return signal.sosfilt(signal.ellip(10, .2, 70, TOP_HZ, fs=SR, output="sos"), dry)


dry = scene()
out = record(dry)
dump_mix(out)
```